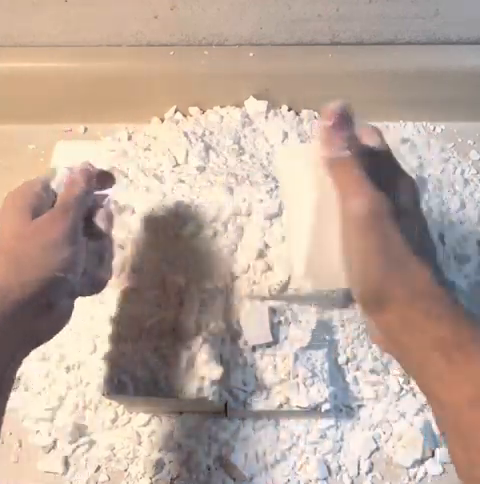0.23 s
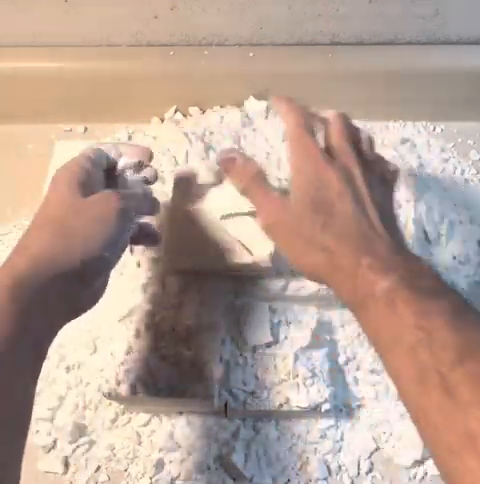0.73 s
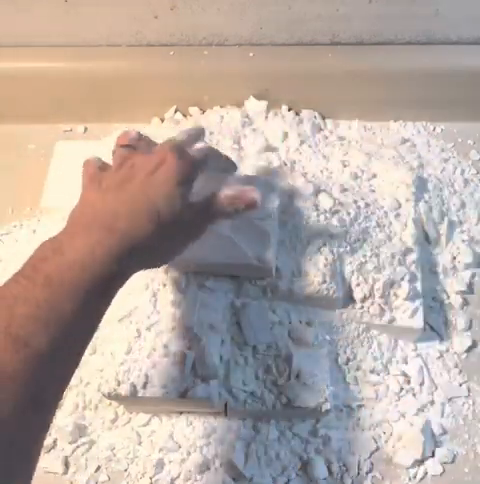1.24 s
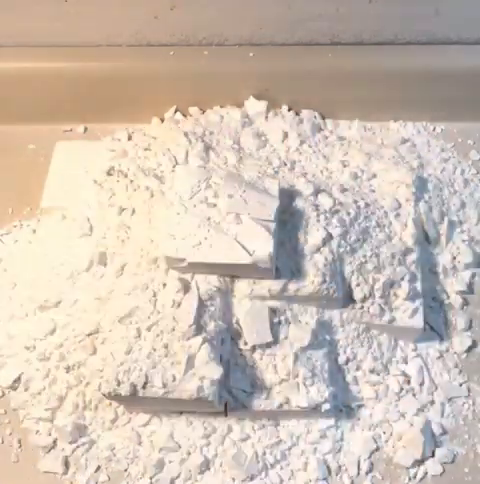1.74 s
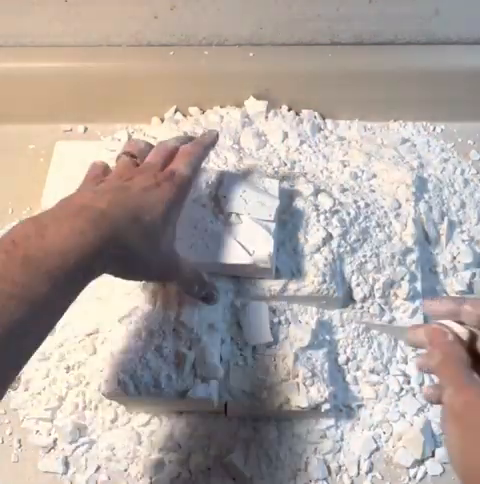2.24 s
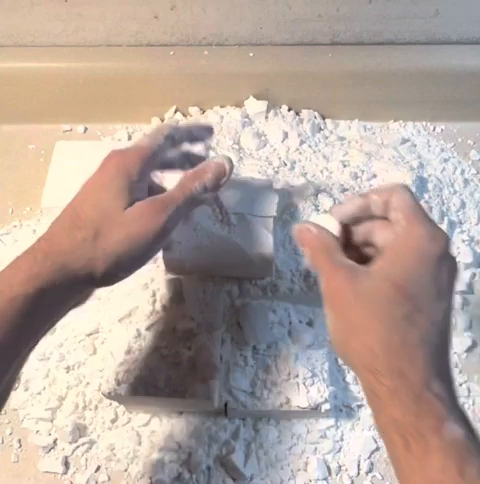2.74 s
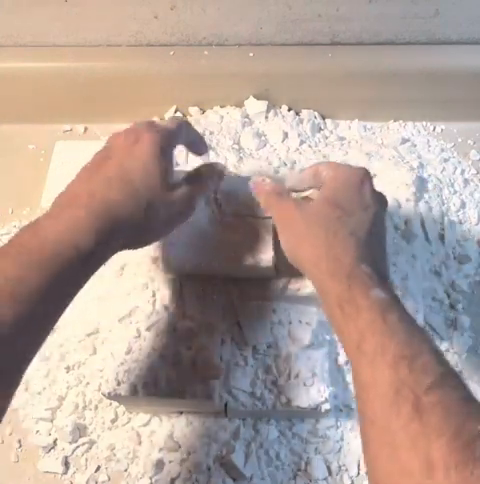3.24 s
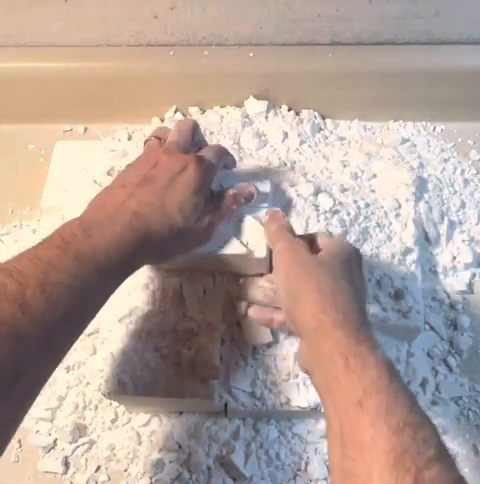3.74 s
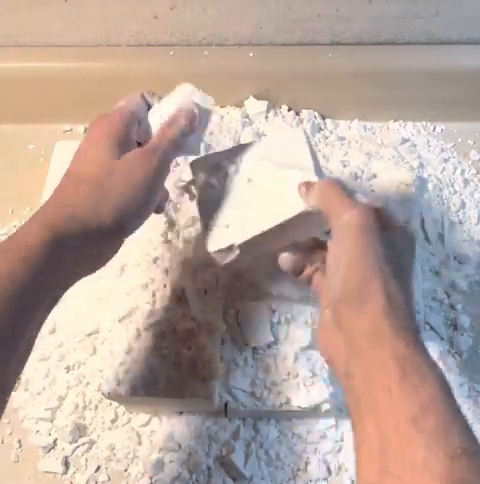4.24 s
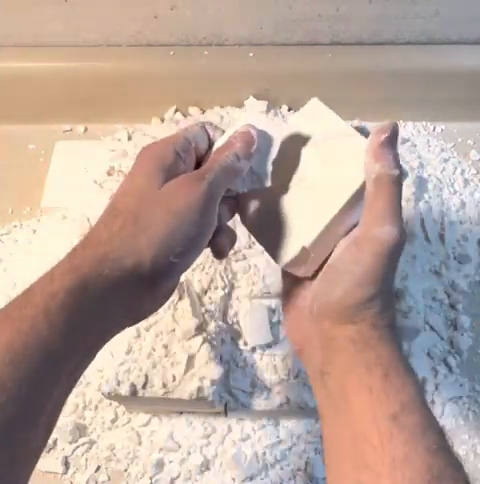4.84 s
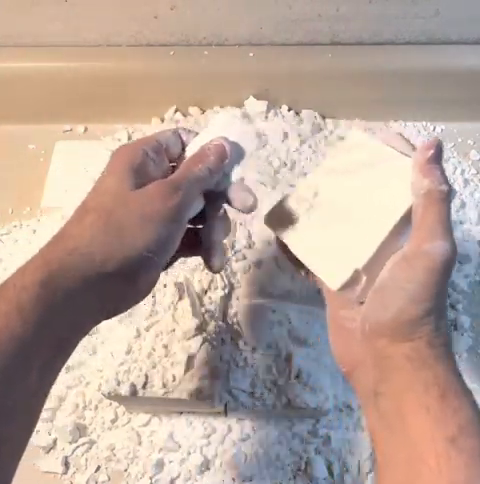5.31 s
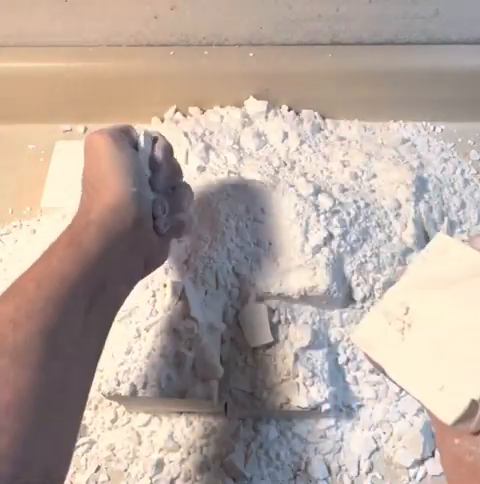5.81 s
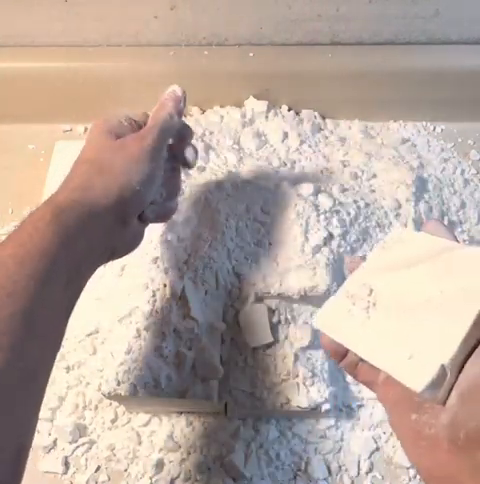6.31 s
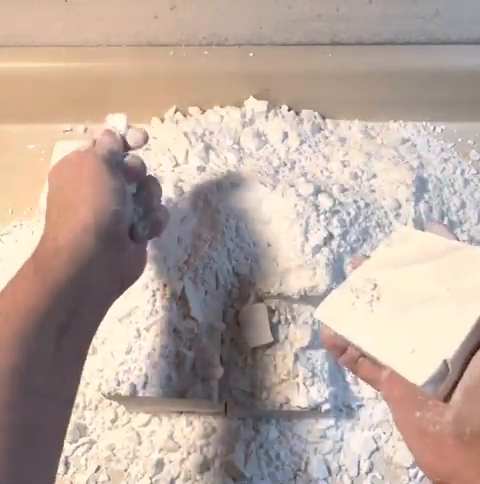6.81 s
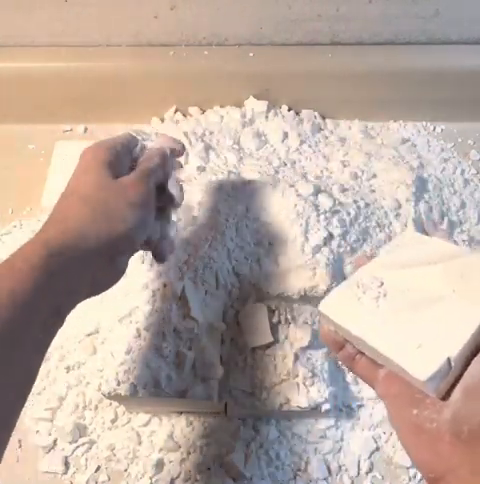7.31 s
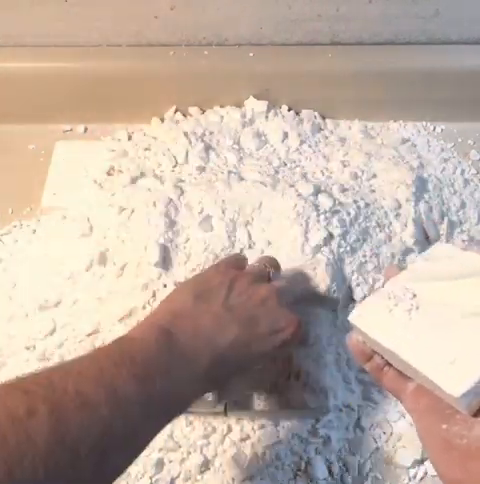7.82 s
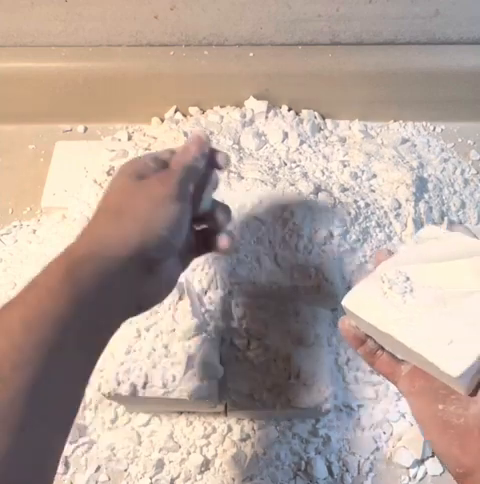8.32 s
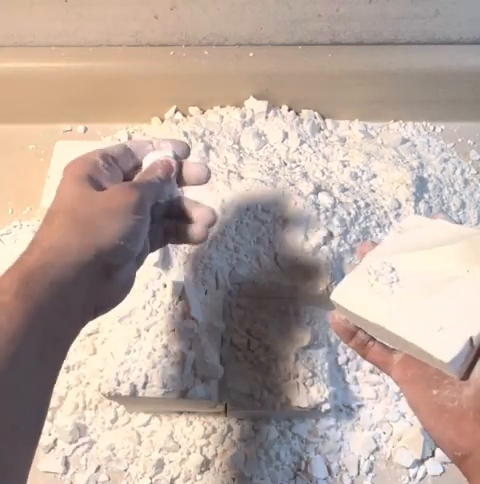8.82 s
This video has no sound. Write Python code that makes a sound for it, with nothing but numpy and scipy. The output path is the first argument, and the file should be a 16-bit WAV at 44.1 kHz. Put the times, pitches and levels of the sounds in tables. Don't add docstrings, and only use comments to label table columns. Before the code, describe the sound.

Very close stereo pickup of hands crushing chalk in a small dry room. Crumbs tick and a block cracks and thuds on a hollow counter, then a soft drop, quiet handling and faint scraping. Midway, dense sharp snaps crunch in the fist, followed by another crunch, lighter ticks and a final crack. A low ventilation hum continues underneath.

```python
import sys
import numpy as np
from scipy import signal
from scipy.fft import rfft, irfft, next_fast_len
from scipy.io import wavfile
from scipy.ndimage import uniform_filter1d, map_coordinates

SR = 44100
rng = np.random.default_rng(int(sys.argv[2]) if len(sys.argv) > 2 else 0)


def generate_wav(signal):
    frames = np.transpose(np.atleast_2d(signal))
    scaled = np.clip(frames, -1, 1) * 32767
    pcm = np.round(scaled).astype(np.int16)
    wavfile.write(sys.argv[1], SR, pcm)


def decibels_to_gain(level_db):
    exponent = np.asarray(level_db, float) / 20
    return 10 ** exponent


N = 399546


def unit(x):
    return x / np.sqrt(np.mean(x ** 2) + 1e-20)


def along(points, hz):
    f, value = np.transpose(points)
    return np.interp(np.log(hz + 1), np.log(f + 1), value)


def wobble(rate_hz):
    knots = rng.standard_normal(int(N * rate_hz / SR) + 4)
    return map_coordinates(knots, [np.arange(N) * rate_hz / SR])


def filtered(x, response):
    size = next_fast_len(N + SR // 2)
    spectrum = rfft(x, size) * response(np.fft.rfftfreq(size, 1 / SR))
    return irfft(spectrum, size)[..., :N]


def resonant(x, modes, order=1):
    def response(f):
        total = 0
        for k, (hz, width_hz, db) in enumerate(modes):
            damping = 1j * f * width_hz
            total = total + (-1) ** k * decibels_to_gain(db) * damping / (hz * hz - f * f + damping)
        total = total ** order
        return total / np.sqrt(np.mean(np.abs(total) ** 2))
    return filtered(x, response)


def pair(size, apart):
    z = rng.standard_normal((3, size))
    return np.sqrt(1 - apart) * z[0] + np.sqrt(apart) * z[1:]


def gesture(peak_s, rise_s, fall_s, hold_s=0):
    since = np.arange(0, N / SR + .002, .001) - peak_s[:, None]
    before = -since / np.c_[rise_s]
    after = (since - np.c_[hold_s]) / np.c_[fall_s]
    return -15 * np.maximum(np.maximum(before, after), 0)


def summed(*levels_db):
    power = sum(np.sum(np.atleast_2d(decibels_to_gain(2 * db)), axis=0) for db in levels_db)
    return np.interp(np.arange(N) / SR, np.arange(len(power)) / 1000, np.sqrt(power))


# start_s [s], level_db [dB peak], pitch_hz [Hz]
TICKS = [(0.1797, -11, 2700), (0.2109, -15, 2860), (0.2543, -23, 3640), (0.2837, 2, 2500),
         (0.3454, -5.5, 2520), (0.3902, -0.5, 1960), (0.405, -9.5, 5000), (0.4913, -7, 1930),
         (0.5641, -14.5, 1970), (0.631, -25.5, 3000), (1.0153, -3.5, 6270), (1.0595, -16, 5770),
         (1.076, -7.5, 2840), (1.1408, -14, 1340), (1.2067, -10, 7140), (1.2234, -10, 5570),
         (1.261, -23.5, 5370), (1.273, -3, 6500), (1.503, -34.5, 7000), (1.6033, -12.5, 6800),
         (2.2895, -16, 2270), (2.555, -15.5, 1700), (3.5762, -24, 3020), (3.6341, -16, 2590),
         (3.7638, -19.5, 4140), (3.7984, -11, 3060), (3.879, -20, 7550), (3.9543, -15.5, 5770),
         (4.1938, -20, 6030), (4.2282, -17.5, 2830), (4.2467, -18, 6300), (4.3839, -24, 7800),
         (6.2572, -6.5, 2550), (6.4883, -10.5, 2100), (7.225, -13, 2570), (7.2446, -11.5, 5540),
         (7.265, -11, 2320), (7.318, -11.5, 2680), (7.3553, -16, 2790), (7.422, -8.5, 2000),
         (7.6849, -11, 3850), (7.7504, -19.5, 1740), (7.763, -20, 9200), (7.925, -22.5, 9200),
         (8.2248, -33, 3610), (8.2507, -17, 1620), (8.3221, -28.5, 9000), (8.063, -36, 10400),
         (8.568, -27.5, 4500), (8.601, -20, 4530), (3.266, -28.5, 2700)]
# start_s [s], level_db [dB peak], pitch_hz [Hz]
CHIPS = [(5.2263, -21, 6230), (5.2704, -8, 4620), (5.5266, -23, 6610), (5.5595, -16, 4730),
         (5.5643, -20, 5220), (5.6097, -3.5, 7700), (5.708, -16, 2700), (5.7354, -6, 2490),
         (5.756, 2.5, 2630), (5.772, -15, 2700), (5.7986, 0, 4040), (5.8192, 2, 4770), (5.8258, 3.5, 2600),
         (5.871, -5.5, 2600), (5.873, -7.5, 4960), (5.878, 6, 2900), (5.8863, -7.5, 3000),
         (5.9297, -26, 7370), (5.9367, -10, 2440), (5.955, -11.5, 2870), (6.0813, -19, 6950),
         (6.0965, -15, 2730), (6.2105, -2, 2600), (6.757, -5.5, 5630), (6.762, -9, 2600), (6.7784, 0, 6600),
         (6.794, -9, 2750), (6.807, -5, 2600), (6.8235, 4, 2460), (6.862, -10, 4530), (6.9229, -8, 2460),
         (6.9638, -11.5, 2500), (7.0731, -18, 5800), (8.8043, 1.5, 2340), (8.8385, -6, 3450),
         (8.8684, -14, 2540), (8.904, -5.5, 4930), (8.9541, -8.5, 6000), (8.972, -13.5, 2700),
         (8.9911, -11, 5030), (9.0484, -15, 2810), (9.0554, 1, 3040)]
# start_s [s], level_db [dB peak], pitch_hz [Hz], dull_db [dB], t60_s [s]
BLOWS = [(0.29, -3.5, 2050, -17, 0.021), (0.4385, -8.5, 2080, -29.5, 0.06),
         (0.5237, 0, 1960, -21.5, 0.0069), (0.631, -9, 1890, -19, 0.11), (0.648, -2, 2900, -23, 0.062),
         (0.6549, -6, 2940, -2, 0.012), (0.6614, 2, 1660, -14, 0.017), (0.67, -14, 2210, -10, 0.015),
         (0.68, -25, 1200, -27, 0.013), (0.605, -22.5, 1960, -25, 0.023), (0.7388, 7.5, 5800, -18.5, 0.014),
         (0.7395, 2, 1970, -12, 0.022), (0.796, -6, 1780, -15, 0.016), (0.8126, -4, 3940, -13, 0.015),
         (0.8125, -7, 1940, -12.5, 0.017), (0.836, -17.5, 1500, -6, 0.012), (1.709, -28, 1000, -2, 0.061),
         (7.838, -32.5, 1370, -1.5, 0.085), (8.2533, -22.5, 1550, -7, 0.024),
         (1.278, -5.5, 1890, -5.5, 0.0097), (1.2973, -10.5, 2400, -7.5, 0.013),
         (1.4866, 0.5, 2020, -8.5, 0.0077), (1.497, -12, 2040, -20, 0.018), (2.2877, -20, 2620, -8, 0.16),
         (2.5522, -19, 2760, -1.5, 0.039), (2.603, -18, 3070, -3, 0.023), (3.465, -5, 1760, -13.5, 0.018),
         (3.44, -26, 1010, 2, 0.016), (3.5348, -18, 1910, 1.5, 0.01), (3.6949, -12.5, 2980, 2.5, 0.012),
         (5.8753, 6, 4900, -7, 0.011), (6.112, -11.5, 2180, 0, 0.036), (6.2023, -6, 2310, -5, 0.017),
         (6.697, -8.5, 476, -23, 0.043), (7.0234, -4, 1360, -25, 0.017), (7.573, -16.5, 1120, -17, 0.019),
         (7.602, -5, 1420, -15.5, 0.012), (7.9454, -13, 1990, -11, 0.037)]
# start_s [s], level_db [dB peak], pitch_hz [Hz], powder_db [dB], t60_s [s]
SNAPS = [(0.7962, -8.5, 6000, -17, 0.039), (0.9538, -7.5, 5360, -14.5, 0.04),
         (4.1255, -19.5, 2820, -4, 0.046), (5.244, -11.5, 6000, -11.5, 0.019),
         (5.289, -12, 4560, -29.5, 0.051), (5.3138, 2, 5100, -10, 0.0066), (5.364, 11.5, 2600, -17, 0.0069),
         (5.5708, 12, 5310, -10.5, 0.0099), (5.5854, 0, 2600, -20, 0.006), (5.6525, 10.5, 2500, -22, 0.015),
         (5.7151, 11, 2320, -36, 0.0048), (5.7484, 9, 2500, -21, 0.0099), (5.786, 12.5, 2600, -29.5, 0.015),
         (5.817, 2, 2670, -23, 0.0054), (5.84, 3.5, 2500, -22.5, 0.0053),
         (6.0322, -1.5, 4930, -29.5, 0.0074), (6.7857, -6.5, 6130, -6.5, 0.014),
         (6.8266, 12.5, 2160, -16, 0.0089), (6.88, -5.5, 1670, -25, 0.013),
         (8.7826, 12.5, 2430, -30, 0.0096), (8.8254, 8.5, 2520, -22, 0.0065),
         (8.9353, 5, 2320, -10.5, 0.0042)]


def breaks():
    for s, db, hz in list(TICKS) + list(CHIPS):
        yield s, db + 2.5, hz, -26, -16, .005, -5.5, SR // 40
    for s, db, hz, dull_db, t60 in BLOWS:
        hiss_db = 6 * np.log2(hz / 6000)
        yield s, db, hz, dull_db, -20.5, t60, hiss_db, SR // 10
    for s, db, hz, powder_db, t60 in SNAPS:
        yield s, db, hz, -22.5, powder_db, t60, 0, SR // 10


# start_s [s], level_db [dB], t60_s [s]
THUDS = [
    (1.834, -16, 0.062),
    (1.846, -11, 0.03),
]
# pitch_hz [Hz], width_hz [Hz], level_db [dB]
THUD_BODY = [(850, 1100, 0)]


def thuds():
    out = np.zeros((2, N + SR))
    t = np.arange(SR // 10) / SR
    for s, db, t60 in THUDS:
        start = round(s * SR)
        out[:, start:start + len(t)] += decibels_to_gain(db - 60 * t / t60) * pair(len(t), 0.89)
    return resonant(out[:, :N], THUD_BODY, order=3)


# pitch_hz [Hz], width_hz [Hz], level_db [dB]
FIST = [(2600, 1360, 0.5), (4930, 1760, 1.5), (6130, 2420, 0)]
HEAP = [(450, 126, 10), (1030, 1060, 6.5)]
POWDER = [(7670, 5100, 0.5), (11820, 650, 6), (14140, 4600, -1.5)]
STRUCK = [(1930, 30, 0), (3020, 32, -1), (5400, 70, -9)]


def cracks():
    hand, heap, powder, ring = np.zeros((4, 2, N + SR))
    for s, db, hz, dull_db, powder_db, t60, hiss_db, size in breaks():
        t = np.arange(size) / SR
        at = slice(round(s * SR), round(s * SR) + size)
        side = decibels_to_gain(db + rng.normal(0, 0.51) * np.array([[1], [-1]]))
        blow = side * decibels_to_gain(-60 * t / t60) * (1 - np.exp(-t / (0.11 * t60)))
        debris = side * decibels_to_gain(-19 - 18 * t / t60) * (1 - np.exp(-t / .002))
        jerks = np.repeat(rng.standard_normal(size // 32 + 1), 32)[:size]
        shape = decibels_to_gain(2.0 * jerks) * (blow + debris)
        puff = 1 - np.exp(-t / 0.00036)
        hand[:, at] += decibels_to_gain(hiss_db) * shape * pair(size, 0.2)
        heap[:, at] += decibels_to_gain(dull_db) * shape * pair(size, 0.39)
        powder[:, at] += decibels_to_gain(powder_db + hiss_db) * shape * puff * pair(size, 0.26)
        ring[:, at] += blow * decibels_to_gain(-95 * t / t60) * np.sin(2 * np.pi * hz * t)
        b, a = signal.iirpeak(hz, 1.6, SR)
        coloured = signal.lfilter(b, a, shape * pair(size, 0.16))
        ring[:, at] += decibels_to_gain(-0.5) * signal.lfilter(b, a, coloured)
        b, a = signal.iirpeak(hz, 6.5, SR)
        ring[:, at] += decibels_to_gain(5.0) * signal.lfilter(b, a, shape * pair(size, 0.065))
    hand, heap, powder, ring = hand[:, :N], heap[:, :N], powder[:, :N], ring[:, :N]
    knocked = heap * (np.arange(N) < 3.5 * SR)
    out = decibels_to_gain(-6) * resonant(hand, FIST)
    out += decibels_to_gain(3.0) * resonant(heap, HEAP, order=2)
    out += decibels_to_gain(11.5) * resonant(powder, POWDER, order=2)
    out += decibels_to_gain(-8) * resonant(knocked, STRUCK, order=2)
    return out + decibels_to_gain(2.5) * ring + thuds()


def grit(per_s, spread_db, t60):
    strength = decibels_to_gain(spread_db * np.minimum(rng.exponential(size=N), 3))
    hits = (rng.random(N) < per_s / SR) * strength
    return unit(signal.lfilter([1], [1, -decibels_to_gain(-60 / (t60 * SR))], hits))


def patchy(x, depth_db):
    z = signal.stft(x, nperseg=512)[2]
    field = uniform_filter1d(rng.standard_normal(z.shape[1:]), size=2, axis=0)
    field = uniform_filter1d(field, size=12, axis=1)
    return signal.istft(z * decibels_to_gain(depth_db * unit(field)), nperseg=512)[1][:, :N]


# peak_s [s], swell_s [s], fade_s [s], level_db [dB], powder_over_crumbs_db [dB]
RUBS = [(.19, 0.17, 1, -30, -7.5), (.963, 0.014, 0.41, -32.5, -7), (1.277, 0.13, 0.063, -37, 9.5),
        (2.923, 0.27, 0.13, -38, 8), (3.397, 0.092, 0.11, -42, 2.5), (3.692, 0.21, 0.14, -43, 11),
        (4.126, 0.34, 0.034, -32, 4), (4.25, 0.28, 0.26, -39, -2), (4.532, 0.14, 0.041, -41.5, 6.5),
        (4.724, 0.11, 0.21, -42, 10.5), (4.87, 0.3, 0.1, -45, 14), (5.272, 0.048, 0.29, -24.5, 4.5),
        (5.574, 0.035, 0.035, -19.5, 2), (6.116, 0.063, .08, -25.5, -1.5), (6.572, 0.028, 0.49, -39, 5),
        (6.84, 0.092, 0.074, -17.5, -7.5), (6.97, 0.024, 0.061, -31, -16), (7.08, 0.027, 0.035, -32, 1),
        (7.273, 0.079, 0.11, -26.5, 1), (7.448, 0.055, 0.056, -32, 2.5), (7.945, 0.016, 0.04, -32, 1.5),
        (7.995, 0.04, 0.023, -36.5, 0), (3.325, 0.02, 0.066, -44, -6.5), (3.585, 0.032, 0.074, -39, 4.5),
        (3.96, 0.02, 0.045, -40, 9), (5.63, 0.05, 0.03, -34, -9), (8.251, 0.051, 0.097, -39, 2.5),
        (8.7, 0.098, 0.03, -35.5, 2), (9.06, 0.026, .1, -20.5, -22)]
# start_s [s], fade_s [s], level_db [dB], heap_over_crumbs_db [dB]
SPILLS = [(0.0, 0.061, -34.5, 1), (.659, 0.058, -26, -8), (0.751, 0.41, -28.5, -4.5),
          (.963, 0.19, -37.5, 11), (2.76, 0.16, -50, 8), (1.29, 0.31, -44.5, 10.5), (1.497, 1, -43.5, 4.5),
          (1.699, 0.57, -44, 11), (1.83, 0.27, -34.5, -19), (1.994, 0.18, -40.5, 1),
          (2.305, 0.33, -41.5, 8), (2.597, 0.058, -36, 2), (3.467, 0.37, -50, 14), (3.692, 0.23, -49, 11.5),
          (3.95, 0.3, -51, 8), (5.667, 0.44, -22, -17), (5.812, 0.18, -21.5, -29), (5.955, 0.073, -33.5, 8),
          (6.216, 0.28, -33.5, -5), (6.599, 0.39, -57, 11), (6.924, 0.28, -36, -2), (7.597, 0.62, -43, 3),
          (7.8, .15, -51.5, 2), (7.9, 0.12, -68, 30.5), (8.256, 0.044, -42.5, 8),
          (8.802, 0.37, -26.5, -8.5)]


def crumbs():
    s, swell, fade, rub_db, fine_db = np.transpose(RUBS)
    rub, rub_db, fine_db = gesture(s, swell, fade), np.c_[rub_db], np.c_[fine_db]
    s, fade, spill_db, heavy_db = np.transpose(SPILLS)
    spill, spill_db, heavy_db = gesture(s, 0.029, fade), np.c_[spill_db], np.c_[heavy_db]
    crumb_gain = summed(rub + rub_db, spill + spill_db, -54.5)
    heap_gain = summed(0.91 * rub + rub_db - 12, spill + spill_db + heavy_db, -52)
    powder_gain = summed(1.87 * rub + rub_db + fine_db, 1.2 * spill + spill_db - 27.5, -58)
    patter = .42 * grit(per_s=320, spread_db=7, t60=.008)

    def stirred(apart):
        return decibels_to_gain(2 * wobble(25)) * (.9 + patter) * pair(N, apart)

    loose = unit(resonant(stirred(0.53), FIST))
    heap = unit(resonant(stirred(1.0), HEAP, order=2))
    powder = unit(resonant(stirred(0.28), POWDER, order=2))
    mix = decibels_to_gain(-3) * crumb_gain * loose + decibels_to_gain(-3.5) * heap_gain * heap + decibels_to_gain(-1.5) * powder_gain * powder
    return patchy(mix, depth_db=3.2)


# start_s [s], end_s [s], level_db [dB], pitch_hz [Hz], spread_oct [octaves]
SLIDES = [(0.114, 0.244, -46, 2870, 0.2), (1.254, 1.319, -33, 5330, 0.073), (1.27, 1.327, -42, 2590, .04),
          (1.261, 1.335, -43, 2880, .13), (1.271, 1.34, -36.5, 1940, .05),
          (2.56, 2.626, -52.5, 5400, 0.069), (3.333, 3.444, -54, 5400, 0.049),
          (3.475, 3.83, -50.5, 5450, 0.039), (3.868, 4.1, -45.5, 5480, 0.05),
          (3.402, 3.428, -45, 2590, .04), (3.308, 3.43, -49, 4260, 0.07), (3.572, 3.768, -48, 2980, .04),
          (3.7, 3.77, -47, 4100, .05), (3.954, 4.092, -44, 2830, 0.13), (5.709, 5.785, -34, 2650, .08),
          (5.789, 5.88, -32, 2650, .08), (3.491, 4.093, -56, 3060, 0.6), (3.878, 4.112, -37, 1180, .2),
          (4.097, 4.144, -43, 6300, 0.52), (4.11, 4.146, -32, 2680, 0.12),
          (4.121, 4.152, -29.5, 4240, 0.028), (4.218, 4.282, -41, 2780, 0.14),
          (4.233, 4.298, -50, 6300, 0.11), (4.474, 4.576, -53, 2780, 0.19), (4.491, 4.571, -49, 4620, 0.18),
          (4.619, 4.723, -45.5, 4620, 0.15), (4.668, 4.821, -44.5, 6300, 0.043),
          (4.681, 4.915, -45, 5370, 0.075), (4.692, 4.982, -46.5, 3730, 0.18),
          (4.695, 4.77, -40, 2980, .05), (4.805, 4.898, -43.5, 2980, .04), (4.69, 4.93, -56, 1940, .04),
          (4.7, 4.796, -42, 3730, .04), (4.8, 4.85, -47, 2590, .04), (4.68, 4.99, -57.5, 2500, 0.39),
          (4.779, 4.954, -57, 2890, 0.13), (4.804, 4.93, -54, 5770, 0.11), (7.303, 7.5, -42.5, 2760, 0.096),
          (8.312, 8.345, -52, 10200, 0.24), (8.375, 8.477, -49.5, 10000, 0.25),
          (8.487, 8.56, -63.5, 11000, 0.23), (8.388, 8.46, -52, 4030, .03),
          (8.589, 8.736, -29.5, 5017, .03)]
# pitch_hz [Hz], width_hz [Hz], level_db [dB]
BLOCK = [(1180, 940, -3), (1940, 70, 3.5), (2590, 94, 0.5), (2980, 85, 1.5), (3730, 140, -0.5),
         (4030, 100, -1), (4240, 110, -5), (4620, 80, 4.5), (5170, 2200, -0.5), (5370, 130, 1.5),
         (5770, 110, 9), (6300, 120, 11.5), (8400, 340, 8), (11770, 220, 7.5)]


def rubbing():
    out = np.zeros((2, N))
    for start, end, db, centre_hz, spread in SLIDES:
        at = slice(round(start * SR), round(end * SR))
        size = at.stop - at.start
        jerks = np.repeat(rng.standard_normal(size // 200 + 1), 200)[:size]
        push = decibels_to_gain(2.5 * jerks) * pair(size, 0.055)
        fade = signal.windows.tukey(size, .65)
        for hz, width_hz, mode_db in BLOCK:
            free = np.exp(-.5 * (np.log2(hz / centre_hz) / spread) ** 2)
            b, a = signal.iirpeak(hz, hz / width_hz, SR)
            mode = signal.lfilter(b, a, 0.094 * push + signal.lfilter(b, a, push))
            knots = np.arange(0, size, 1400)
            flicker = np.interp(np.arange(size), knots, rng.standard_normal(len(knots)))
            out[:, at] += free * decibels_to_gain(db + mode_db) * fade * unit(decibels_to_gain(2.5 * flicker) * mode)
    return out


# start_s [s], held_s [s], level_db [dB], t60_s [s]
PUSHES = [(0.677, 0.034, -9, 0.12), (0.745, 0.009, -18.5, 0.38), (0.817, 0.0078, -20, 0.31),
          (0.95, 0.02, -37, 0.4), (2.647, 0.013, -17, 0.1), (1.308, .005, -21, 0.14),
          (1.41, 0.018, -41, 10), (1.84, 0.0041, -26, 0.076), (2.339, 0.0039, -27, 0.08),
          (2.449, 0.0045, -24, 0.16), (2.579, 0.021, -18, 0.23), (2.72, 0.028, -27.5, 0.4),
          (3.417, .005, -26, 0.12), (3.466, 0.0036, -18, 0.33), (3.571, 0.0049, -24.5, 0.11),
          (3.672, 0.0061, -23.5, 0.09), (3.727, 0.0083, -25, 0.88), (3.986, 0.13, -28, 0.22),
          (7.772, 0.02, -34.5, 0.39), (7.947, 0.014, -28.5, 0.29)]


def pushes():
    s, held, db, t60 = np.transpose(PUSHES)
    return summed(np.c_[db] + gesture(s, 0.001 * decibels_to_gain(-db), t60 * 15 / 60, held))


# pitch_hz [Hz], width_hz [Hz], level_db [dB]
PANEL = [(96, 10, 0), (64, 10, -13)]
# start_s [s], level_db [dB peak], pitch_hz [Hz]
KNOCKS = [(0.648, -14, 400), (0.657, -5.5, 259), (0.664, -5, 388), (0.963, -16.5, 370), (1.831, -18, 540),
          (1.845, -6.5, 388), (2.299, -14.5, 327), (2.314, -22, 380), (2.33, -18, 290), (2.358, -19, 353),
          (2.39, -26, 408), (1.709, -21.5, 420), (7.754, -26.5, 332), (6.698, -24, 534), (2.8, -30, 476),
          (3.9, -28.5, 450), (3.97, -27, 465), (4.06, -27.5, 446), (5.789, -24, 390), (8.254, -34, 786),
          (2.56, -20.5, 317), (2.616, -16, 190), (3.464, -12, 373), (3.539, -17.5, 398), (3.702, -16, 392),
          (5.877, -21, 926), (6.115, -15, 209), (7.945, -24, 294)]


def counter():
    swing = 0
    for hz, width_hz, db in PANEL:
        level = decibels_to_gain(db + 10.5 + wobble(27))
        drifting_hz = hz + width_hz / 2 * wobble(14)
        swing = swing + level * np.sin(2 * np.pi * np.cumsum(drifting_hz) / SR)
    out = np.pad(pushes() * swing, (0, SR))
    t = np.arange(SR // 4) / SR
    for s, db, hz in KNOCKS:
        tone = np.sin(2 * np.pi * hz * t)
        tone += 0.28 * np.sin(2 * np.pi * 1.37 * hz * t + 6 * rng.random())
        start = round(s * SR)
        out[start:start + len(t)] += decibels_to_gain(db - 60 * t / 0.072) * (1 - np.exp(-t / 0.00031)) * tone
    return decibels_to_gain([[.4], [-.4]]) * out[:N]


# pitch_hz [Hz], t60_s [s]
ROOM = [(200, 0.43), (2000, 0.17), (10000, 0.097)]


def room(x):
    hz, t, z = signal.stft(rng.standard_normal((2, SR // 3)), SR, nperseg=256)
    decay = decibels_to_gain(-60 * t / along(ROOM, hz)[:, None])
    tail = signal.istft(z * decay, SR, nperseg=256)[1]
    late = np.pad(x, ((0, 0), (150, 0)))
    return signal.fftconvolve(late, tail / np.linalg.norm(tail[0]), axes=1)[:, :N]


# pitch_hz [Hz], level_db [dB per Hz]
AIR = [(15, -45), (25, -8.5), (170, 6), (205, -7.5), (390, -8.5), (528, -39.5), (852, -26.5), (3300, -120)]
# pitch_hz [Hz], likeness [-1 to 1]
ALIKE = [(60, 0.95), (250, 0.94), (600, 0.039), (1500, 0.66)]
# pitch_hz [Hz], level_db [dB]
WHINE = [(357, -42), (1072, -64), (1787, -61)]


def ventilation():
    def rumble(hz):
        turn = np.arccos(np.clip(along(ALIKE, hz), -1, 1)) / 2
        return decibels_to_gain(along(AIR, hz)) * [np.cos(turn), np.sin(turn)]

    mid, side = filtered(rng.standard_normal((2, N)), rumble)
    air = decibels_to_gain(-27.5 + 0.15 * wobble(2.7)) * unit(np.array([mid + side, mid - side]))
    t = np.arange(N) / SR
    motor_db = np.interp(t, [3.9, 4.2], [-7, 0])
    for hz, db in WHINE:
        level = decibels_to_gain(db + motor_db + 1.5 * wobble(9))
        air = air + level * np.sin(2 * np.pi * hz * t + wobble(9))
    return air


def scene():
    breaking = cracks()
    echo = decibels_to_gain(-13) * room(breaking)
    return breaking + echo + crumbs() + rubbing() + counter() + ventilation()


# pitch_hz [Hz], left_lead_rad [radians]
PORTS = [(500, 0), (800, -.6), (1200, 0), (2800, .4), (4400, .1), (6400, -1.3), (7900, -.5), (9400, -1.45)]


def microphones(x):
    def response(hz):
        return np.exp(.5j * along(PORTS, hz) * np.array([[1], [-1]])) * (hz < 15950)
    return filtered(x, response)


def band_limit(x):
    return signal.sosfilt(signal.butter(12, 16610, fs=SR, output="sos"), x)


def record(dry):
    change_s, drop_db, fade_s = 1.853, -24, .12
    since = np.arange(N) / SR - change_s
    dip = (since > 0) * np.clip(1 - since / fade_s, 0, 1)
    x = microphones(dry) * decibels_to_gain(drop_db * dip)
    x = x / (1 + np.abs(x) ** 8) ** (1 / 8)
    return band_limit(x)


dry = scene()
out = record(dry)
generate_wav(out)
```